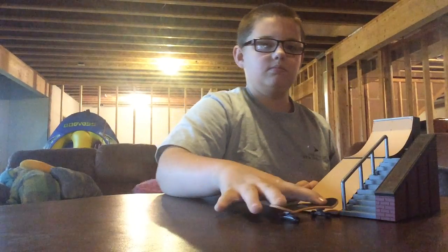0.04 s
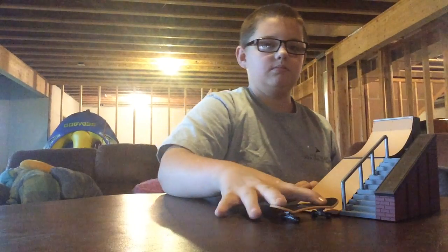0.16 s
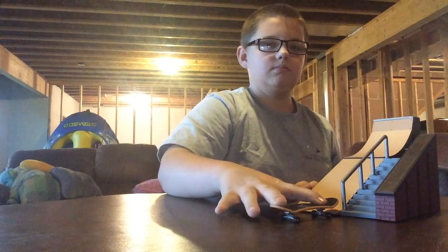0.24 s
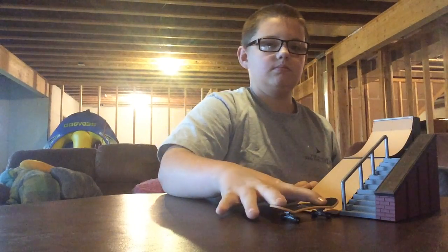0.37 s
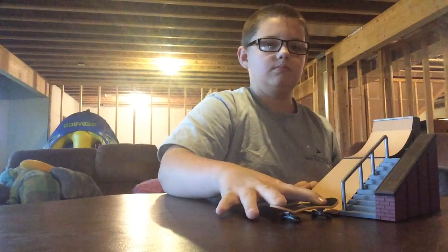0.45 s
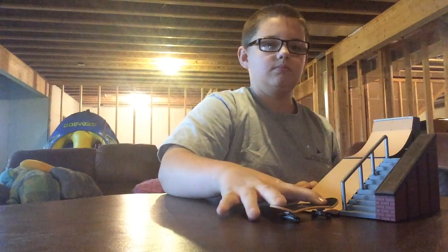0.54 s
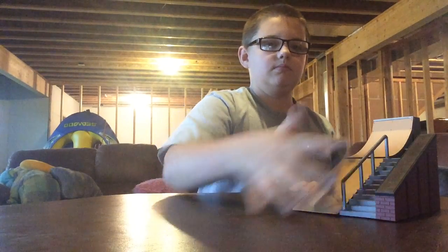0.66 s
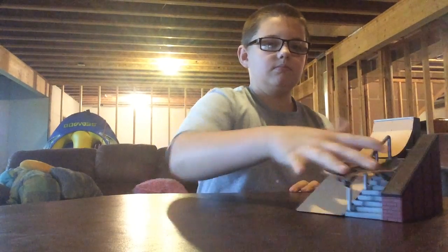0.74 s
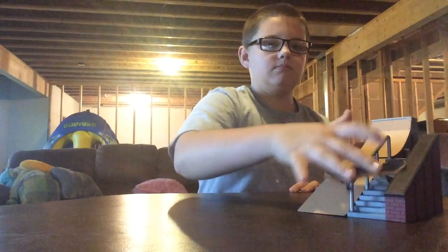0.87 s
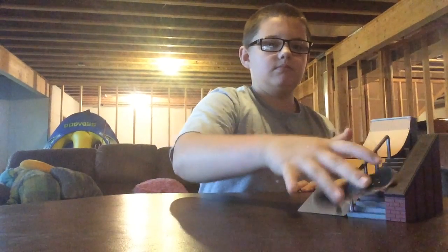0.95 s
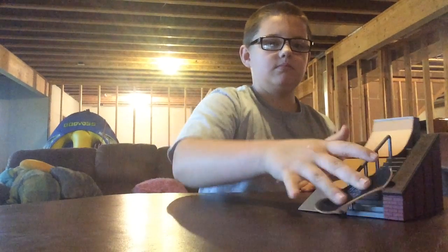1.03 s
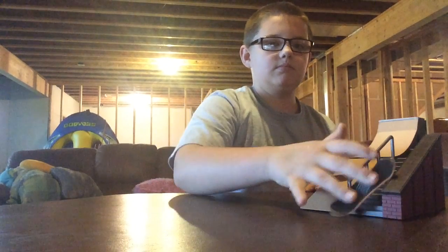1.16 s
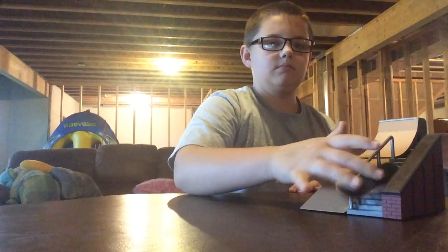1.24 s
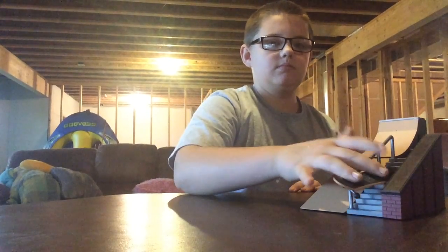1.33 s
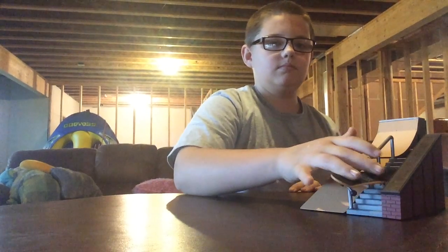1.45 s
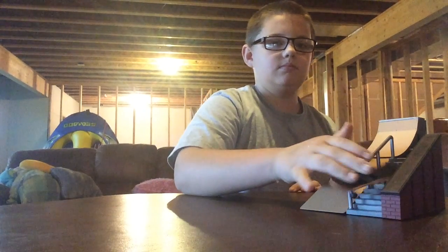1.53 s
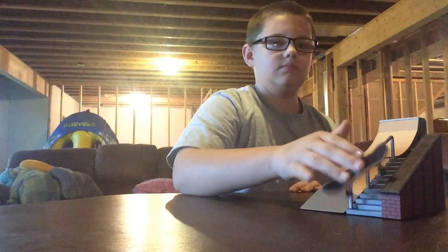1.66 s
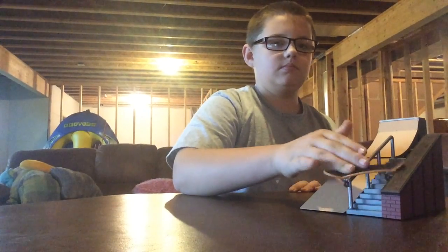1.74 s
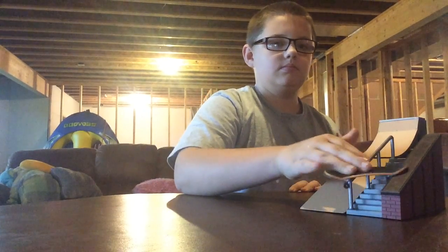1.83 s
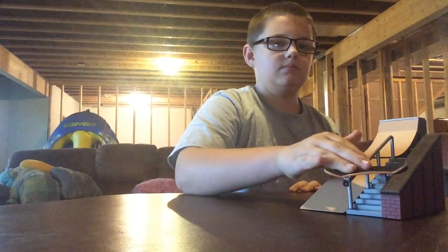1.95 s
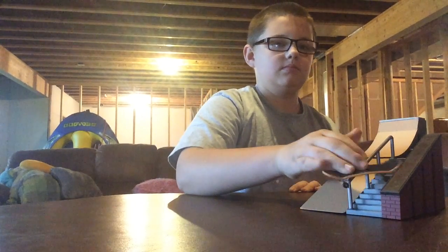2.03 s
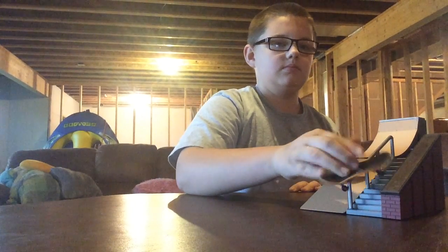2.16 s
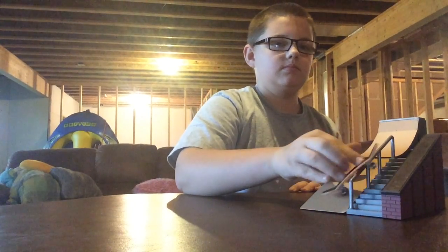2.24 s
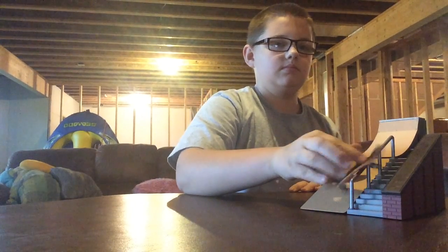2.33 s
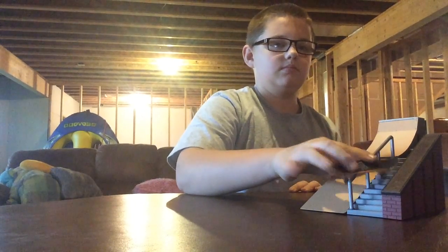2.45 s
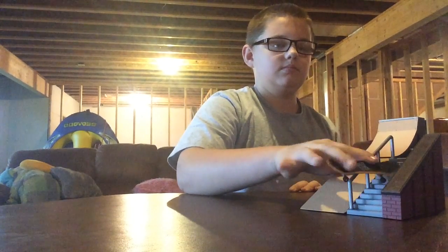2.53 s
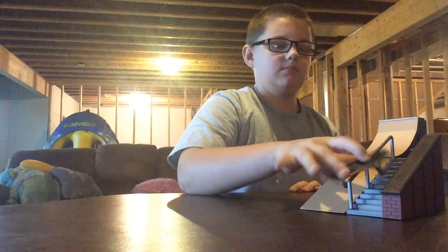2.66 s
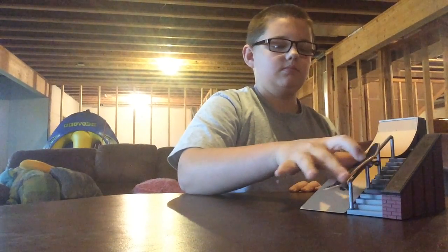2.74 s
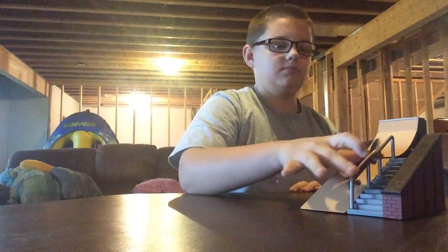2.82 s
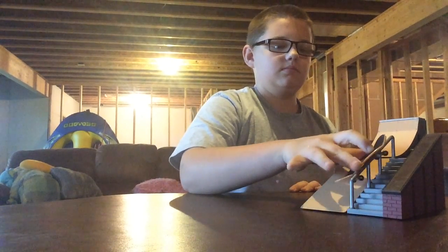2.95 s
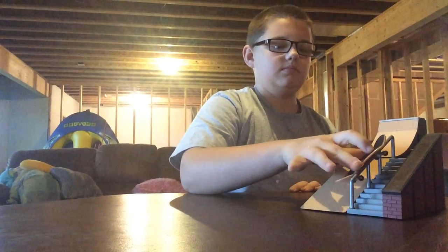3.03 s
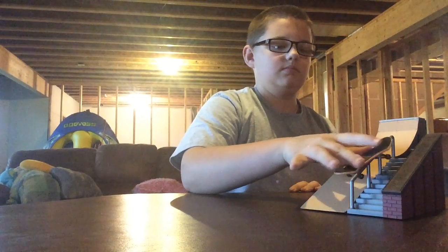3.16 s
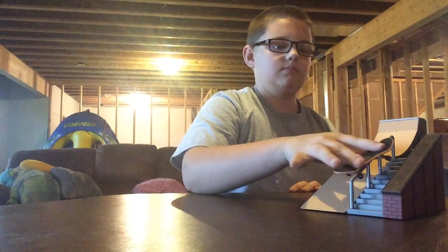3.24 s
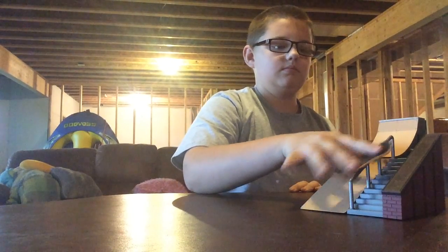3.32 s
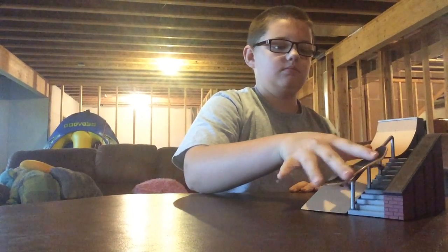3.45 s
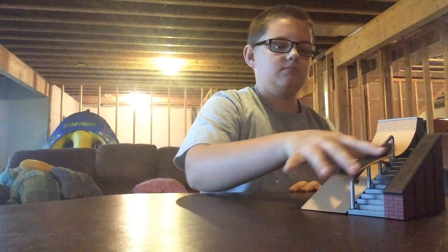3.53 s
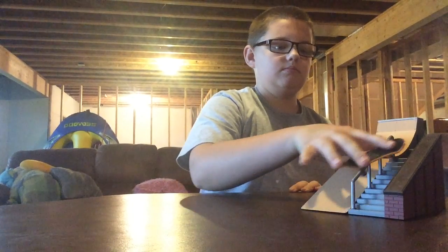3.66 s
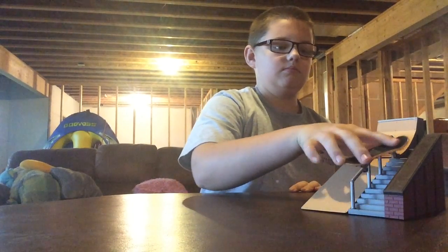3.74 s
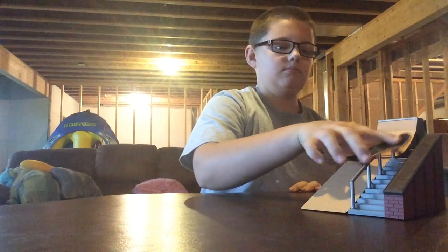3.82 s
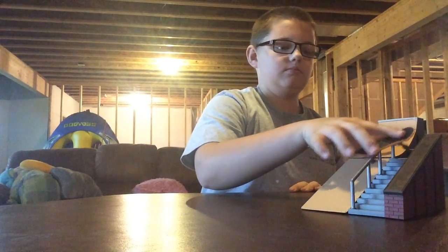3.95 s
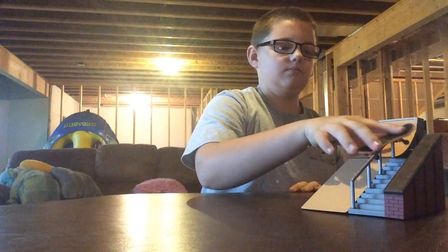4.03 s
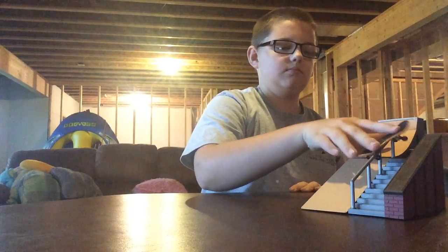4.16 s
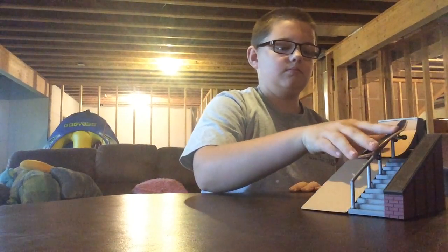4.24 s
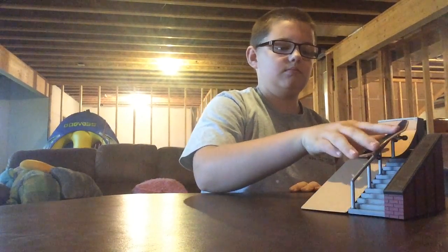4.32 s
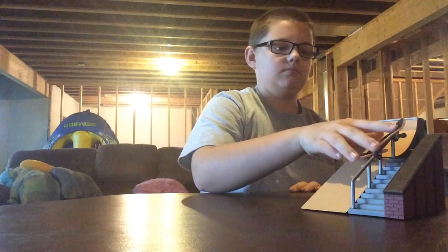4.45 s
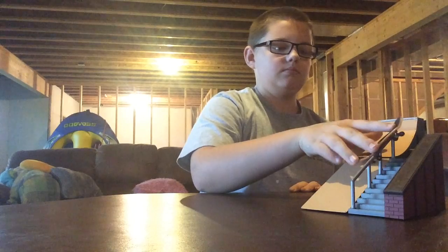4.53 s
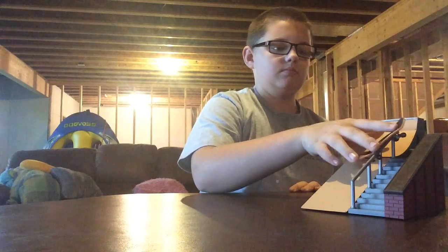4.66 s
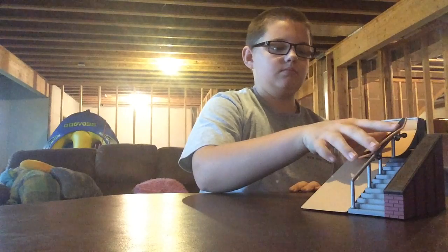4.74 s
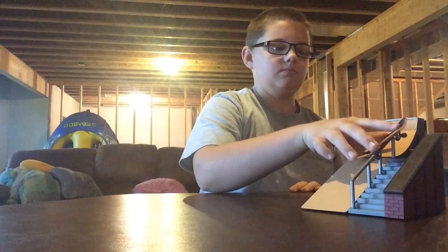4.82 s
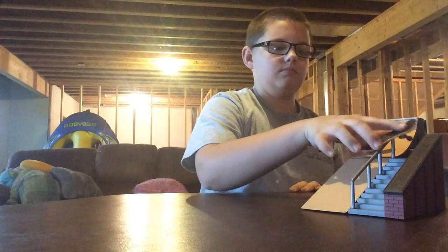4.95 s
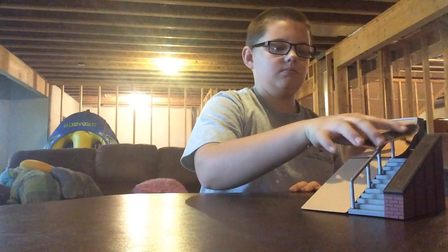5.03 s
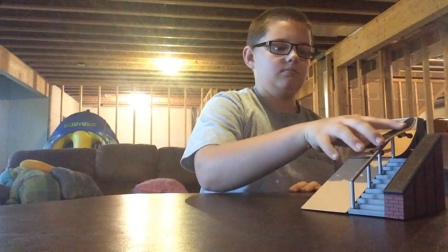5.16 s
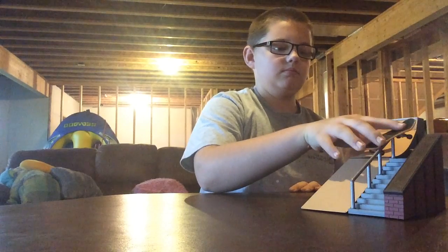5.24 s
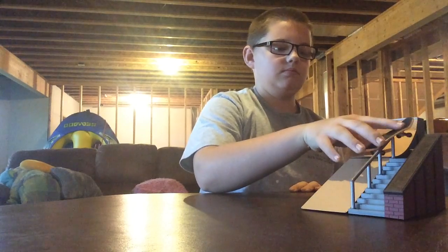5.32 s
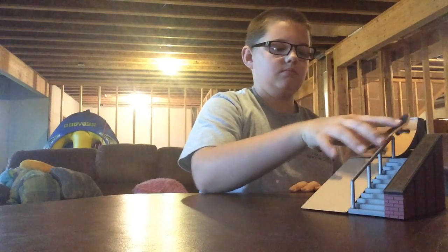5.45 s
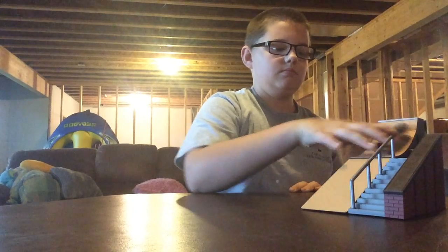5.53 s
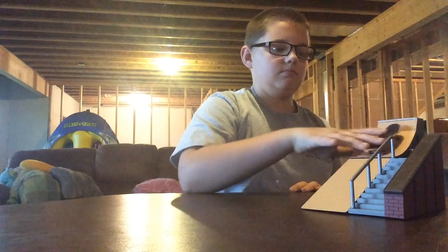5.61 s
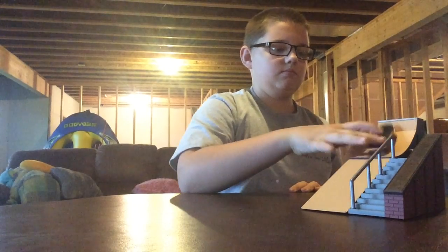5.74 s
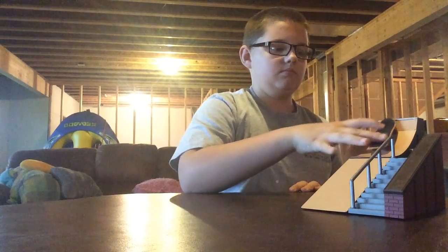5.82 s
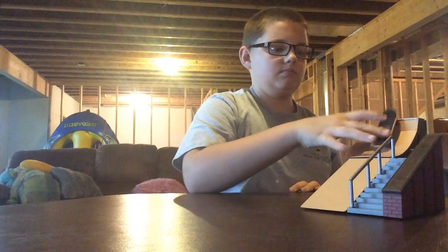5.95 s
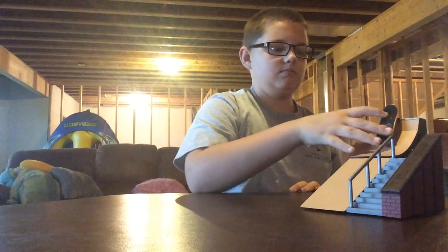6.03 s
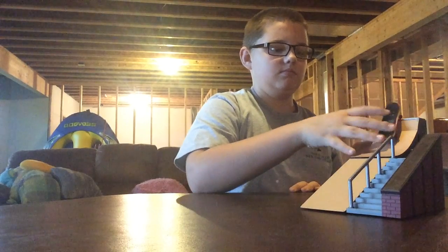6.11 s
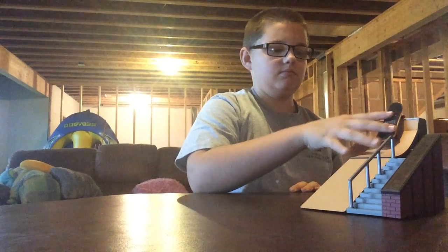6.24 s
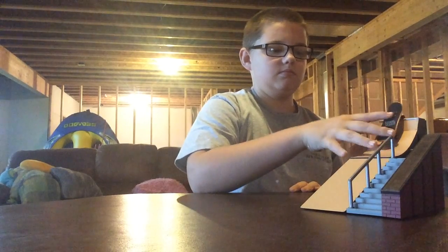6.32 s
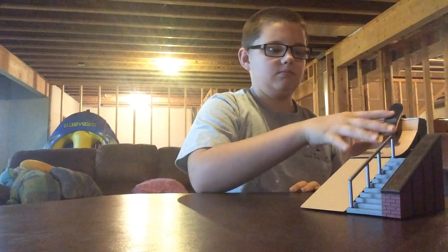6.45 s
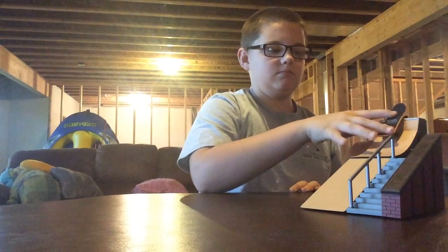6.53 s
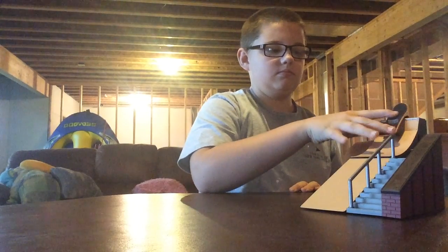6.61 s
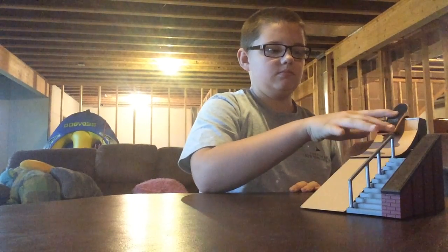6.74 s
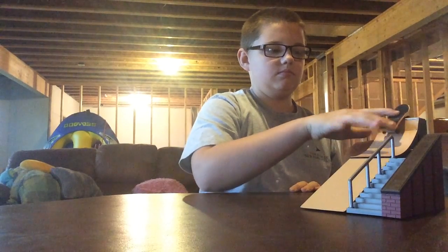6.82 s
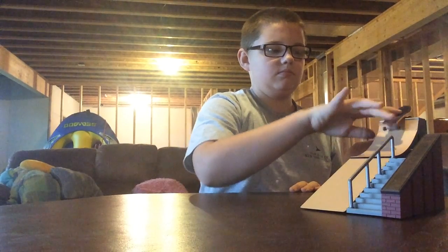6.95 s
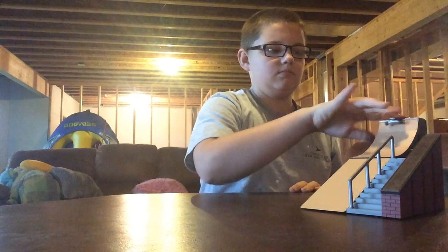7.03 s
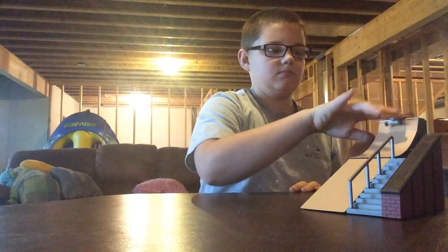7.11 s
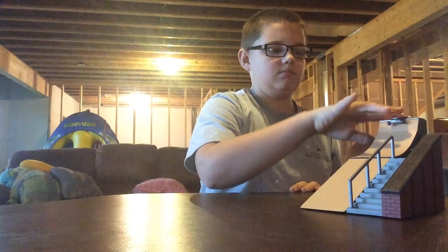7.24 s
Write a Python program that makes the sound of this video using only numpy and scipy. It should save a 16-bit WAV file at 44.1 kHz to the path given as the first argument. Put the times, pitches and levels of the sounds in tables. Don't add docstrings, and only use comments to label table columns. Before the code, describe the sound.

A toy finger skateboard clacks sharply on hollow plastic stairs, taps lightly, then lands harder on a hollow ramp, over a steady fan hum.

```python
import sys
import numpy as np
from scipy import signal
from scipy.io import wavfile

SR = 44100
rng = np.random.default_rng(int(sys.argv[2]) if len(sys.argv) > 2 else 0)


def digitize_waveform(pressure):
    field = np.atleast_2d(pressure).T
    bounded = np.clip(field, -1, 1)
    quanta = np.round(bounded * 32767).astype(np.int16)
    wavfile.write(sys.argv[1], SR, quanta)


def undo_db(level):
    steps = np.asarray(level, float) / 20
    return 10 ** steps


N = 321036


def rms_one(x):
    return x / np.sqrt(np.mean(x ** 2) + 1e-20)


def peak_one(x):
    return x / np.max(np.abs(x))


def at_hz(points, hz):
    points_hz, values = np.array(points).T
    return np.interp(np.log(hz), np.log(points_hz), values)


def band(x, low_hz, high_hz):
    return signal.sosfilt(signal.butter(2, [low_hz, min(high_hz, .45 * SR)], "band", fs=SR, output="sos"), x)


def drift(rate_hz):
    knots = rng.standard_normal(500)
    return np.interp(np.arange(N) / SR * rate_hz, np.arange(500), knots)


def fading(kicks, t60_s):
    return signal.lfilter([1], [1, -undo_db(-60 / (t60_s * SR))], kicks)


def ring(force, hz, t60_s):
    r = undo_db(-60 / (t60_s * SR))
    w = 2 * np.pi * hz / SR
    return signal.lfilter([0, np.sin(w)], [1, -2 * r * np.cos(w), r * r], force + 1e-18)


def strike(force, modes, spread_db=0, wander=0, luck=np.zeros((14, 2))):
    out = 0
    for k, (hz, db, t60_s) in enumerate(modes):
        strength = undo_db(db + spread_db * luck[k, 0])
        pitch_hz = hz * (1 + wander * luck[k, 1])
        out = out + (-1) ** k * strength * ring(force, pitch_hz, t60_s)
    return out


def grit(count, per_s):
    sizes = undo_db(4.1 * np.minimum(rng.exponential(1, count), 4)) * rng.choice([-1, 1], count)
    return sizes * (rng.random(count) < per_s / SR)


# (time [s], clack level [dB], hollow level [dB], tick level [dB], strongest ring [Hz])
STAIR_KNOCKS = [(0.7305, -33, -24, -30, 814), (0.7821, -20, -22.5, -11, 1350),
                (0.8064, -40, -23.5, -9.5, 6000), (0.814, -10.5, -20, -33, 910),
                (0.8284, -33, -23, -14.5, 1070), (0.8664, -20.5, -26, -56, 5400),
                (1.0031, -35.5, -39, -55, 1530), (1.0464, -37, -56, -34, 1570),
                (1.1034, -30, -30, -23, 1480), (1.1897, -27.5, -37, -28, 3530),
                (1.2825, -29.5, -37.5, -49, 3550), (1.3623, -14, -22, -14, 2500),
                (1.4611, -31, -36.5, -55, 1520), (1.6696, -25.5, -36.5, -55, 1580),
                (1.6846, -31.5, -31, -46, 1650), (1.8238, -29.5, -38, -25.5, 1220),
                (1.8946, -39, -42, -40, 3420), (1.947, -24, -31, -24, 1500),
                (2.1954, -24.5, -33, -25.5, 1580), (2.4987, -32, -44, -43, 1270),
                (2.799, -33.5, -47, -31.5, 1740), (3.0385, -33, -32, -29, 3000),
                (3.493, -27, -31, -22, 3300), (4.1225, -35.5, -38.5, -36, 3240)]
# (time [s], clack level [dB], tick level [dB], strongest ring [Hz])
STAIR_TAPS = [(1.0178, -38, -50, 3150), (1.291, -35, -53, 3640), (1.5422, -44.5, -72, 1490),
              (1.7606, -58, -41, 902), (1.777, -53, -64, 1690), (1.7857, -45, -60, 920),
              (1.7978, -63, -42, 3100), (2.102, -39.5, -39, 1820), (2.2213, -40.5, -27.5, 3900),
              (2.313, -46.5, -49, 1830), (2.3887, -38, -61, 960), (2.3993, -67, -47, 1030),
              (2.469, -54, -40, 6290), (2.5242, -41, -36, 1190), (2.5877, -40.5, -39, 1680),
              (2.6034, -55, -36, 875), (2.817, -40, -42, 940), (2.9145, -36.5, -45, 1090),
              (2.9343, -51, -70, 1630), (3.2324, -50, -75, 895), (3.392, -50, -62, 1000),
              (3.516, -66, -35, 3000), (3.6645, -53, -73, 1770), (3.6894, -52, -77, 956),
              (3.733, -51, -41, 1140), (3.8311, -41.5, -38, 1000), (4.807, -46, -59, 3300),
              (5.013, -46.5, -62, 3040), (5.028, -40.5, -34, 2500), (5.098, -49, -36, 6330)]
# (time [s], clack level [dB], hollow level [dB], tick level [dB], strongest ring [Hz])
RAMP_KNOCKS = [(5.6003, -22, -17, -24, 1750), (5.6084, -19, -22, -21, 960), (5.6222, -13, -16, -13, 3500),
               (5.628, -15, -9, -18, 1550), (5.645, -38, -32, -34, 1470), (5.847, -36, -31, -50, 1230),
               (5.8738, -39, -25.5, -47, 1180), (5.9784, -33, -40, -55, 2700),
               (6.0995, -32.5, -23, -30.5, 1500), (6.2304, -29, -25, -48, 4100),
               (6.3296, -48, -60, -54, 5100), (6.348, -32, -25, -42, 2300),
               (6.5525, -36.5, -29.5, -43, 3500), (6.6407, -35, -24, -25, 2930),
               (7.1045, -32, -16.5, -36, 1335), (7.1135, -35, -19, -33, 1170),
               (7.1244, -29, -13.5, -26, 1880), (7.1465, -19, -22.5, -17, 1880),
               (7.2198, -16, -12.5, -28, 1830), (7.137, -34, -21, -34, 3500)]
# (frequency [Hz], level [dB], t60 [s])
BOARD_MODES = [(1190, -4, .01), (1600, -3, .013), (1960, -5, .01), (2400, -3, .012), (3200, -4, .011),
               (4300, -5, .008), (5100, -5, .007), (6000, -6, .008)]
# (frequency [Hz], level [dB], t60 [s])
RAMP_DECK_MODES = [(870, -6, .018), (1220, -4, .018), (1620, -5, .018), (1960, -2, .025), (2400, -5, .011),
                   (3050, -6, .009), (4250, -5, .009), (5900, -7, .008)]
# (frequency [Hz], level [dB], t60 [s])
TRUCK_MODES = [(7600, -5, .005), (8900, -6, .005), (10300, -2, .008), (11700, -4, .006)]
# (frequency [Hz], level [dB], t60 [s])
STAIR_HOLLOW_MODES = [(383, 4, 0.054), (423.6, 6.2, 0.054), (537, 12.2, 0.028), (711.6, 10.4, 0.057),
                      (840, 15, 0.025)]
# (frequency [Hz], level [dB], t60 [s])
RAMP_HOLLOW_MODES = [(407, -13, 0.046), (467.8, -1, 0.047), (529, 1.5, 0.045), (591, -1.5, 0.04),
                     (690, -7, .035), (880, -11, 0.035), (1210, -13, 0.02), (1928, -25, 0.027)]


def knocks(table, plate_modes, wander, hollow_modes, chatter_s, cavity_hz, cavity_t60_s):
    lead_s = .0012
    out, t = np.zeros(N + SR), np.arange(SR // 3) / SR
    short = slice(0, SR // 12)
    push = np.exp(-(t / 0.00053 - 2) ** 2)
    cavity_push = ring(push, cavity_hz, cavity_t60_s)
    chance = zip(rng.standard_normal((70, SR // 12)), rng.standard_normal((70, 3, 14, 2)))
    for (s, clack_db, hollow_db, tick_db, ring_hz), (noise, luck) in zip(table, chance):
        crack = noise * np.exp(-t[short] / chatter_s)
        crack *= np.minimum(t[short] / lead_s, 1) ** 2
        crack[round(lead_s * SR)] += 3.0
        plate = strike(crack, plate_modes, 2, wander, luck[0])
        trucks = strike(crack, TRUCK_MODES, 2, .05, luck[1])
        hollow = strike(cavity_push, hollow_modes, 2, .03, luck[2])
        main_ring = band(crack, ring_hz / 1.3, ring_hz * 1.3)
        wide_body = band(crack, min(ring_hz / 1.93, 900), ring_hz * 2.71)
        clack = .5 * peak_one(plate) + .8 * peak_one(main_ring)
        clack = peak_one(clack + 1.21 * peak_one(wide_body))
        tick = peak_one(0.033 * peak_one(trucks) + peak_one(band(crack, 2180, 12500)))
        sound = undo_db(hollow_db + 0.5) * peak_one(hollow)
        sound[short] += undo_db(clack_db + 1.0) * clack + undo_db(tick_db - 3.5) * tick
        out[round((s - lead_s / 2) * SR):][:len(t)] += sound
    return out[:N]


# (time [s], level [dB], pitch [Hz], t60 [s])
PINGS = [(7.1052, -33, 1880, .05), (7.1242, -27, 1950, .04), (7.1465, -16, 1960, .055),
         (7.147, -24, 4150, .025), (7.124, -32, 3900, .03), (7.1245, -33, 6100, .025),
         (7.147, -25, 10500, .006), (7.2198, -22, 4500, .02), (7.2198, -24, 1960, .03),
         (1.3625, -23, 2400, .012), (1.364, -28, 3050, .03), (1.375, -33, 3000, .03),
         (5.6235, -16, 5900, .022), (5.6222, -22, 4000, .02), (5.6007, -30, 9000, .008),
         (6.2308, -33, 4200, .014), (6.2312, -36, 11000, .005), (6.2325, -37, 13500, .005),
         (6.2185, -52, 11500, .004), (6.3472, -42, 11000, .005), (6.5525, -42, 12500, .005),
         (6.558, -46, 12000, .004), (6.567, -44, 11500, .004), (6.6425, -35, 12000, .005),
         (6.657, -44, 9500, .004), (5.9742, -33, 3200, .012), (5.9742, -40, 6000, .006),
         (6.0996, -37, 1750, .03), (5.8485, -38, 1800, .02), (5.86, -42, 1750, .025),
         (6.24, -42, 1600, .05), (6.35, -42, 4200, .015), (1.4612, -36, 1650, .025),
         (1.4612, -42, 5000, .015), (0.8145, -20, 2900, .012), (0.782, -26, 6200, .015),
         (1.1897, -36, 10200, .02), (1.104, -36, 9500, .015), (1.947, -34, 2300, .02),
         (3.4935, -33, 4300, .015), (1.8946, -40, 3200, .04), (1.9475, -32, 3200, .04),
         (1.6696, -34, 1600, .03), (1.685, -33, 1500, .035), (2.5877, -42, 1650, .025),
         (3.392, -43, 1020, .025), (5.028, -44, 3800, .015), (1.3628, -20, 4200, .015),
         (7.2198, -24, 3000, .025), (6.553, -42, 1600, .03)]


def pings():
    out, t = np.zeros(N + SR), np.arange(SR // 8) / SR
    for (s, db, hz, t60_s), noise in zip(PINGS, rng.standard_normal((60, SR // 8))):
        contact = (1.5 * (t == 0) + noise) * np.exp(-t / .0008)
        pair = ring(contact, hz, t60_s) + .6 * ring(contact, hz * 1.022, .7 * t60_s)
        out[round(s * SR):][:len(t)] += undo_db(db) * peak_one(pair)
    return out[:N]


def rattle(table, hollow_modes, board_modes, board_db, hollow_db, t60_s, top_hz, air):
    kicks, rows = np.zeros((2, N)), np.array(table)
    kicks[:, (rows[:, 0] * SR).astype(int)] = undo_db(rows[:, 1:3].T)
    board_gain, hollow_gain = fading(kicks + 1e-18, t60_s)
    grains = grit(N, 1500) * undo_db(5.0 * drift(60))
    bright = rms_one(strike(grains, board_modes))
    bright += 1.5 * rms_one(band(grains, 520, top_hz))
    bright += air * rms_one(band(grains, 8300, 13500))
    hollow = strike(grains * hollow_gain, hollow_modes) / np.std(strike(grains, hollow_modes))
    return undo_db(board_db) * board_gain * rms_one(bright) + undo_db(hollow_db) * hollow


# (time [s], length [s], skid level [dB], hollow level [dB])
SKIDS = [(0.874, 0.091, -56.5, -59), (1.004, 0.071, -58, -60), (1.093, 0.011, -48, -46),
         (1.24, 0.027, -56, -45.5), (1.266, 0.03, -49.5, -49), (1.322, 0.04, -44, -43.5),
         (1.657, 0.025, -56, -43), (1.769, .03, -61, -63), (1.93, 0.015, -57, -47),
         (2.555, 0.14, -68.5, -77), (5.6, .02, -32, -23.5), (5.625, 0.01, -26, -16),
         (5.68, 0.053, -50, -51), (5.72, 0.11, -56, -44), (5.836, 0.057, -51, -38),
         (5.947, 0.047, -55, -42), (6.01, 0.024, -70, -50), (6.055, 0.072, -60, -48),
         (6.183, 0.063, -59.5, -42.5), (6.3, 0.046, -65, -63), (6.493, 0.087, -65, -47),
         (6.599, 0.051, -64, -60), (7.107, 0.037, -44, -26.5), (5.053, 0.052, -71, -64)]
# (time [s], length [s], level [dB], pitch [Hz], width [octaves])
SQUEAKS = [(1.025, 0.035, -48, 3250, 0.08), (1.343, .016, -40, 6200, .3), (1.343, .016, -42, 4300, .2),
           (1.005, .06, -59, 10400, .25), (5.84, .05, -46, 1500, 1.1), (.83, .09, -43, 800, 1.6),
           (1.365, .05, -44, 9500, .9), (6.235, .03, -52, 10500, .9), (6.645, .03, -50, 10500, .9),
           (0.735, .04, -52, 6000, 1.2), (1.02, .04, -58, 6500, .3), (2.909, 0.019, -48, 1200, 1.3),
           (3.388, 0.012, -51, 1040, 0.77), (5.97, 0.019, -38, 2970, 0.64), (6.066, .026, -53, 3150, 0.3),
           (7.107, 0.07, -40, 1910, .25), (7.107, 0.032, -38, 1260, .3), (7.228, 0.046, -48, 4300, .12),
           (1.003, 0.053, -51, 1500, 0.45), (1.327, .035, -43.5, 1460, 0.28), (6.233, 0.036, -56, 1540, .1),
           (1.25, 0.037, -55, 1400, .3), (7.144, 0.017, -33, 820, 0.17), (7.229, 0.013, -33, 830, .2),
           (6.185, 0.045, -62, 3500, 0.5), (7.068, .015, -60, 1200, 1.7), (1.89, 0.026, -54, 3200, 0.4),
           (1.094, .035, -50, 10000, .4), (1.19, .03, -50, 10200, 0.25)]


def skids():
    out, count = np.zeros(N + SR), SR // 5
    skid_hz, skid_octaves, squeak_hollow_db = 2500, 1.82, -12
    broad = [(s, length, db, skid_hz, skid_octaves, hollow_db) for s, length, db, hollow_db in SKIDS]
    narrow = [(s, length, db, hz, octaves, db + squeak_hollow_db) for s, length, db, hz, octaves in SQUEAKS]
    for s, length, skid_db, centre_hz, octaves, hollow_db in broad + narrow:
        grains = grit(count, 6000)
        swell = np.sin(np.pi * np.clip(np.arange(count) / SR / length, 0, 1)) ** 0.58
        modes = RAMP_HOLLOW_MODES if s > 5.5 else STAIR_HOLLOW_MODES
        half_width = 2 ** (octaves / 2)
        hiss = rms_one(band(grains, centre_hz / half_width, centre_hz * half_width))
        body = strike(grains * swell, modes) / np.std(strike(grains, modes))
        out[round(s * SR):][:count] += undo_db(skid_db) * swell * hiss + undo_db(hollow_db) * body
    return out[:N]


def pushes(table, push, modes, spread_db, wander):
    out, lucks = np.zeros(N + SR), rng.standard_normal((60, 14, 2))
    for (s, db), luck in zip(table, lucks):
        out[round(s * SR):][:len(push)] += undo_db(db) * peak_one(strike(push, modes, spread_db, wander, luck))
    return out[:N]


# (time [s], level [dB])
THUMPS = [(0.71, -38), (0.7232, -22), (0.7278, -11), (0.828, -27), (0.8655, -23), (1.002, -33),
          (1.1037, -18), (1.3626, -29), (1.8226, -31), (1.8945, -41), (1.947, -42), (2.1014, -40),
          (2.1953, -35.5), (2.3988, -39.5), (2.524, -40.5), (2.5875, -40.5), (2.801, -41.5), (3.0383, -33),
          (3.493, -29), (3.5145, -29), (3.8302, -39.5), (4.1228, -42), (5.0131, -34.5), (5.6005, -20),
          (5.6098, -17), (5.6243, -16), (5.7, -34), (6.2303, -35.5), (6.552, -30.5), (6.6432, -31.5),
          (7.1236, -21), (7.1445, -17), (7.219, -29)]
# (frequency [Hz], level [dB], t60 [s])
TABLE_MODES = [(63, -6, 0.14), (102.2, 1, 0.22), (160.4, 0, 0.093), (210, -0.5, 0.11), (262, 2.5, 0.07),
               (335, 0, 0.08), (406, -7, 0.015)]
# (time [s], level [dB])
BOOMS = [(0.733, -28), (0.814, -35), (0.999, -43), (1.103, -33), (1.362, -39), (1.823, -41), (2.523, -51),
         (3.046, -44), (3.502, -36), (3.514, -36), (3.828, -52), (5.025, -52), (5.603, -29), (5.629, -36),
         (6.237, -48), (7.124, -37), (7.148, -32)]
# (frequency [Hz], level [dB], t60 [s])
BOOM_MODES = [(46, -6, .3), (96, 0, .24), (205, -4, .14)]
# (time [s], level [dB])
BUMPS = [(5.836, -30), (5.856, -36), (5.893, -38), (5.951, -42), (5.962, -36), (5.982, -34), (6.012, -44),
         (6.024, -42), (6.054, -46), (6.068, -35), (6.077, -33), (6.204, -46), (6.238, -27), (6.374, -42),
         (5.655, -26), (5.69, -36)]


def thumps():
    t = np.arange(SR // 3) / SR
    thump_push = ring(np.exp(-(t / 0.00031 - 2) ** 2), 281, .014)
    boom_push = np.exp(-(t / .0012 - 2) ** 2)
    bump_push = ring(np.exp(-(t / .0005 - 2) ** 2), 600, .004)
    table = pushes(THUMPS, thump_push, TABLE_MODES, 2.2, .03)
    boom = pushes(BOOMS, boom_push, BOOM_MODES, 2.2, .02)
    hollow = pushes(BUMPS, bump_push, RAMP_HOLLOW_MODES, 3.0, .055)
    return undo_db(-3.5) * table + undo_db(-5.5) * boom + hollow


# (frequency [Hz], t60 [s])
BASEMENT_T60 = [(100, 0.66), (400, 0.33), (1500, 0.21), (5000, 0.22), (14000, 0.31)]
# (delay [s], smear [s], level [dB])
ECHOES = [
    (.005, 0.00057, -23.5),
    (0.015, 0.005, -12.5),
]


def basement(x, tail_db, build_s):
    t = np.arange(SR // 2) / SR
    edges = 60 * 2 ** np.arange(0, 8.5, .5)
    white = rng.standard_normal((3, len(t)))
    tail = np.zeros(len(t))
    for k, (low, high) in enumerate(zip(edges, edges[1:])):
        tail += band(white[k % 2], low, high) * undo_db(-60 * t / at_hz(BASEMENT_T60, low))
    tail *= 1 - np.exp(-(t / build_s) ** 2)
    answer = undo_db(tail_db) * tail / np.sqrt(np.sum(tail ** 2))
    for late, smear, db in ECHOES:
        echo = white[2] * np.exp(-((t - late) / smear) ** 2)
        answer += undo_db(db) * echo / np.sqrt(np.sum(echo ** 2))
    return x + signal.fftconvolve(x, answer)[:N]


# (frequency [Hz], density [dB per Hz])
FAN_AIR = [(15, -43), (25, -17), (123, -6), (145, -25.5), (175, -1.5), (249, -10.5), (270, -26.5),
           (354, 7.5), (394, -11), (476, -9.5), (754, -16), (2160, -25), (2410, -26), (14800, -38.5),
           (16000, -51)]
# (frequency [Hz], level [dB rms])
HUM = [(118.4, -70), (177.6, -67), (236.9, -69.5), (355.3, -70), (414.5, -76), (893.6, -90.5), (1830, -82),
       (2008, -98.5), (2126, -95), (2186, -80)]


def fan():
    edges = 22 * 2 ** np.arange(0, 9.7, 1 / 3)
    white = rng.standard_normal((2, N))
    air, hum, t = np.zeros(N), np.zeros(N), np.arange(N) / SR
    for k, (low, high) in enumerate(zip(edges, edges[1:])):
        level_db = at_hz(FAN_AIR, np.sqrt(low * high)) + 1.2 * drift(21)
        air += undo_db(level_db) * band(white[k % 2], low, high)
    for hz, db in HUM:
        hum += np.sqrt(2) * undo_db(db + 2.0 * drift(21)) * np.sin(2 * np.pi * (hz * t + rng.random()))
    return undo_db(-60) * rms_one(air) + hum


def rumble(times):
    house_db, shake_db, shake_t60_s = -86.5, -75, 2.13
    kicks = np.zeros(N)
    kicks[(np.array(times) * SR).astype(int)] = undo_db(shake_db)
    gain = undo_db(house_db) + fading(kicks, shake_t60_s)
    return gain * undo_db(3.3 * drift(4.5)) * rms_one(band(rng.standard_normal(N), 28, 83))


def scene():
    taps = [(s, clack_db, clack_db - 3.5, tick_db, hz) for s, clack_db, tick_db, hz in STAIR_TAPS]
    stairs = STAIR_KNOCKS + taps
    toy = knocks(stairs, BOARD_MODES, 0.1, STAIR_HOLLOW_MODES,
                 chatter_s=0.0045, cavity_hz=561, cavity_t60_s=0.0076)
    toy += knocks(RAMP_KNOCKS, RAMP_DECK_MODES, 0.023, RAMP_HOLLOW_MODES,
                  chatter_s=0.0055, cavity_hz=890, cavity_t60_s=0.0034)
    toy += thumps()
    toy += rattle(stairs, STAIR_HOLLOW_MODES, BOARD_MODES,
                  board_db=-23, hollow_db=-20, t60_s=0.15, top_hz=9000, air=1.3)
    toy += rattle(RAMP_KNOCKS, RAMP_HOLLOW_MODES, RAMP_DECK_MODES,
                  board_db=-13.5, hollow_db=-16.5, t60_s=0.091, top_hz=6500, air=.9)
    toy += pings()
    background = fan() + rumble([row[0] for row in stairs + RAMP_KNOCKS])
    room = basement(toy + skids(), tail_db=-13.5, build_s=0.0084)
    return (room + background)[None]


def low_pass(x):
    return signal.sosfilt(signal.butter(12, 16180, fs=SR, output="sos"), x)


def record(dry):
    low_cut = signal.butter(2, 34, "high", fs=SR, output="sos")
    top_cut = signal.butter(14, 15050, fs=SR, output="sos")
    mix = signal.sosfilt(top_cut, signal.sosfilt(low_cut, dry))
    return low_pass(mix)


dry = scene()
out = record(dry)
digitize_waveform(out)
```